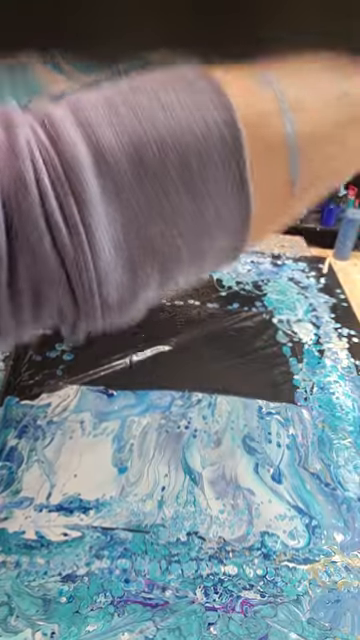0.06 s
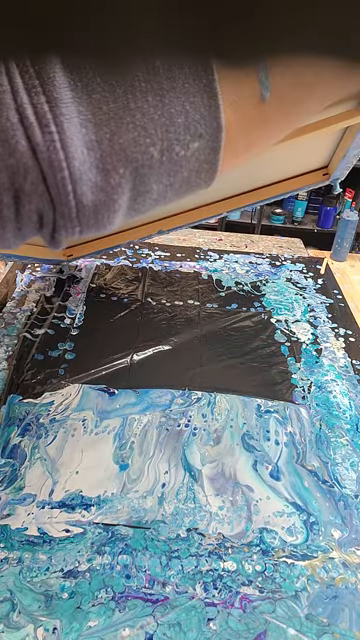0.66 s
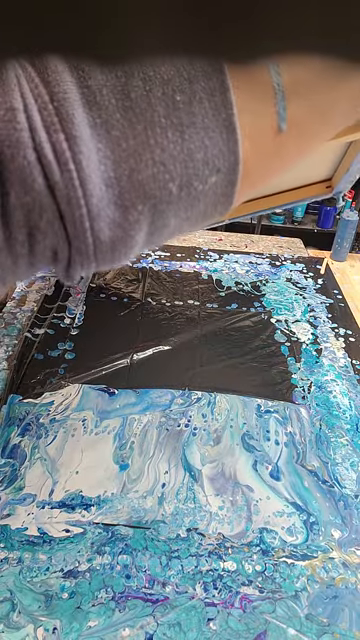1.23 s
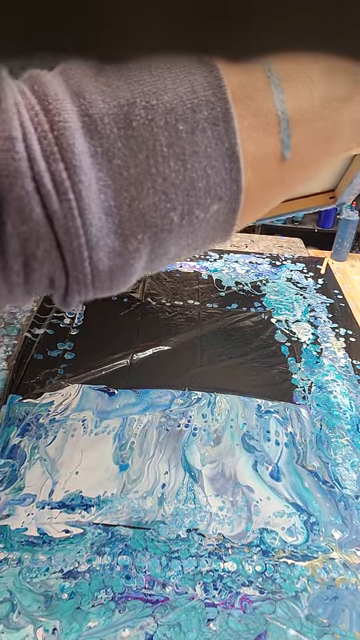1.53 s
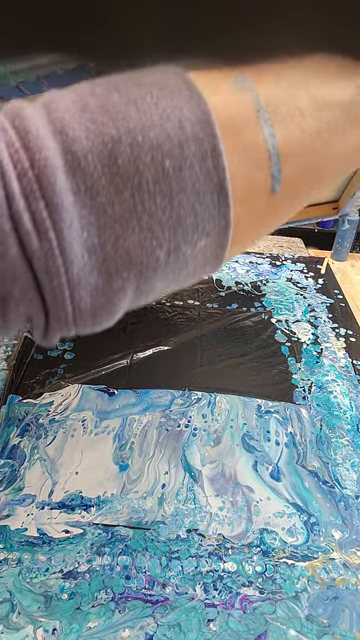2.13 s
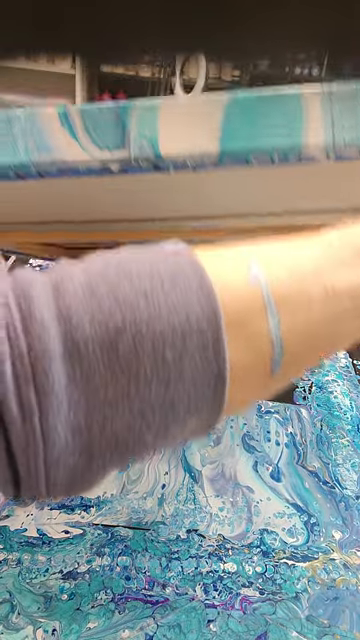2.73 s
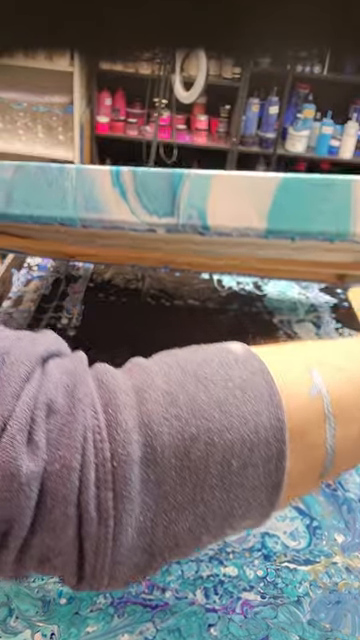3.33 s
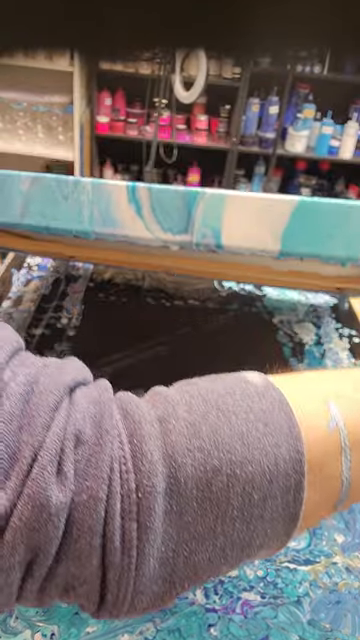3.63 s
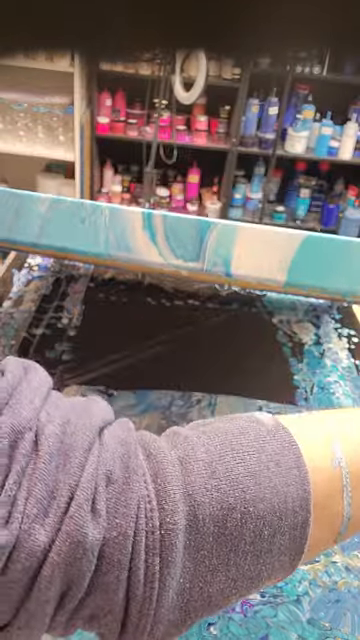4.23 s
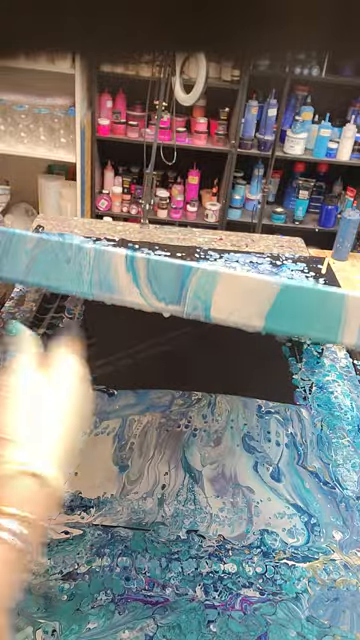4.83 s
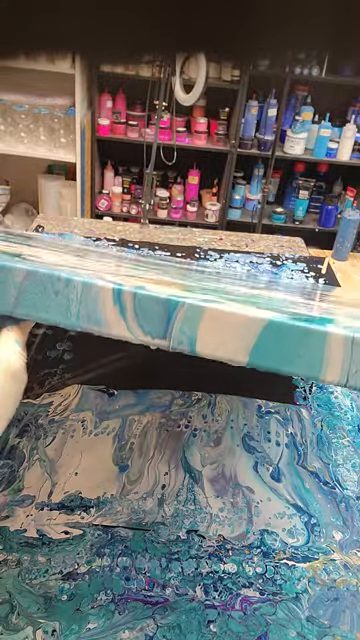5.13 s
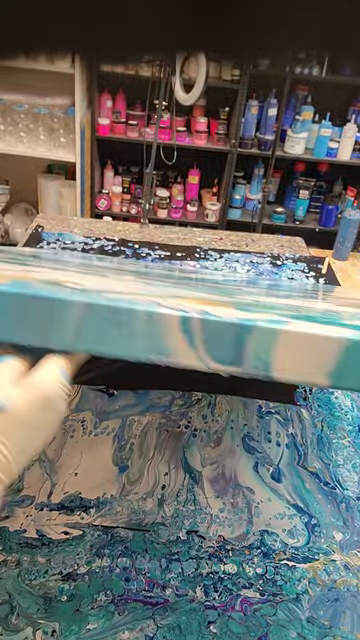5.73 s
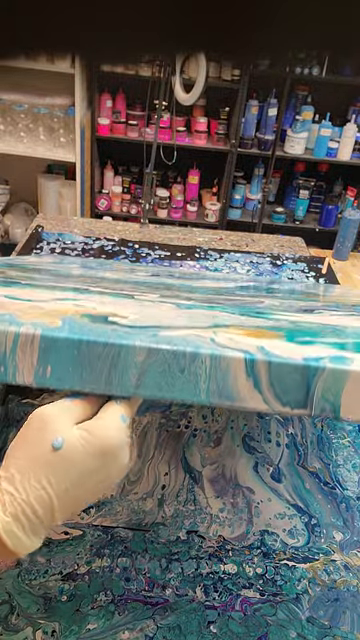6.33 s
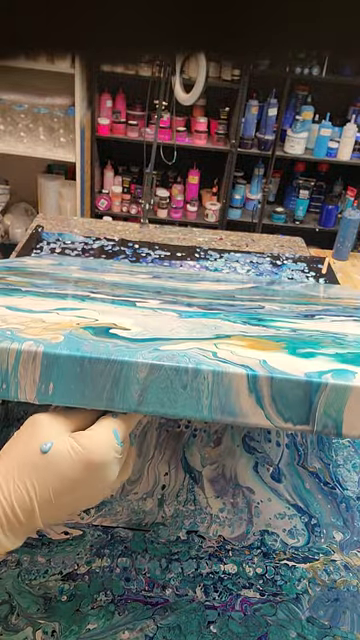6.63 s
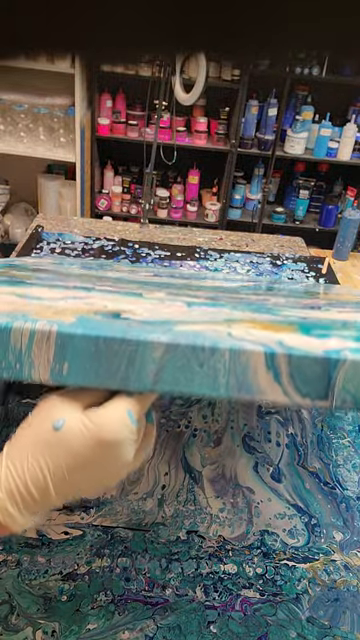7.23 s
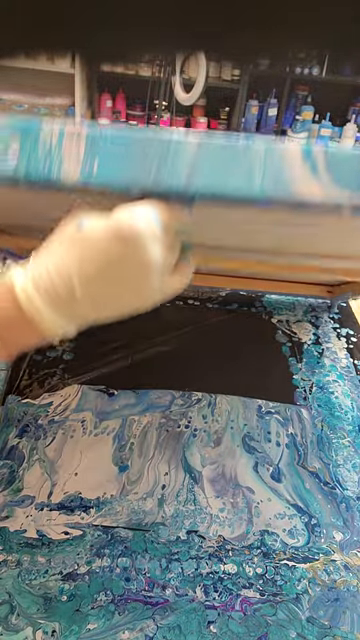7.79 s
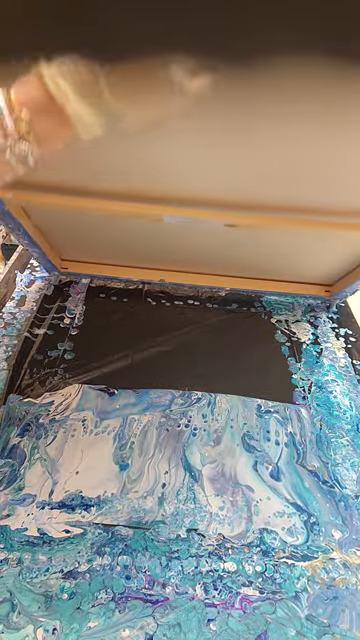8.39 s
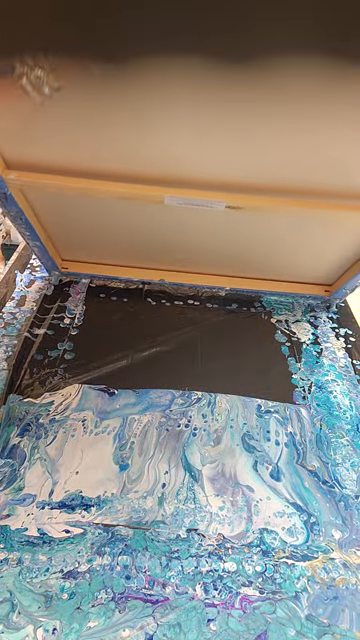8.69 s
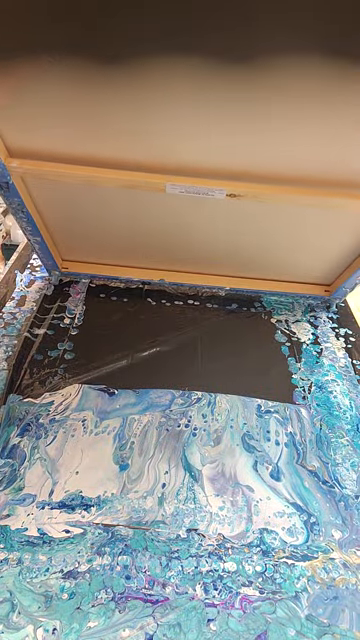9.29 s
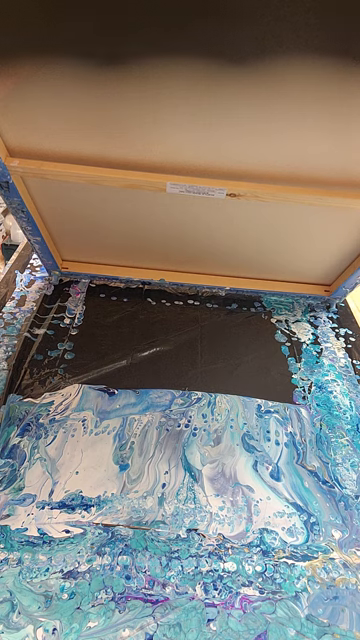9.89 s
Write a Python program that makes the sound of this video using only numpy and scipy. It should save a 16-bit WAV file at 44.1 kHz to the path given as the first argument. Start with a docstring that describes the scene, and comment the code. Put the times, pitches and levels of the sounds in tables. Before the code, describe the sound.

A very low ventilation rumble runs throughout in a small workroom, with the faint brush of a knitted sleeve close by. For the first four seconds, gloves and plastic sheeting give sparse, light clicks, the clearest near 1.4 seconds. At about 3.9 seconds a wooden-framed canvas meets its support with a soft thud, followed at once by a firmer, boomy knock. A bracelet clinks lightly at 4.6 seconds. At 5.3 seconds comes the loudest sound, a hollow wooden knock with a drum-like canvas thump, and a lighter second knock right after; both die away quickly in the room. From 5.5 to 7 seconds gloves rub and tick quietly on the canvas, ending in a short, brighter scuff around 7.2 seconds. A few faint clicks follow between 8.2 and 9.3 seconds. Everything is much quieter than the knocks.

```python
"""In a small workroom, gloved hands tilt a large wet canvas on a wooden stretcher.
The frame lands on its supports, two knocks at a time, and each impact excites the modes of wood and
canvas. Gloves and plastic sheeting click and slide by stick-slip friction; a bracelet's links collide
and ring. The room reverberates briefly, and a sleeve brushes close by over a low ventilation rumble."""
import sys
import numpy as np
from scipy import signal
from scipy.fft import rfft, irfft
from scipy.io import wavfile
from scipy.ndimage import uniform_filter1d

SR = 44100
rng = np.random.default_rng(int(sys.argv[2]) if len(sys.argv) > 2 else 0)


def inscribe(sig):
    """Save sig as 16-bit PCM at rate SR to the path in sys.argv[1].

    A 1-D sig is mono; a 2-D sig holds one channel per row.
    Samples are clipped to [-1, 1] before scaling.
    """
    pcm = np.round(np.clip(np.atleast_2d(sig).T, -1, 1) * 32767)
    wavfile.write(sys.argv[1], SR, pcm.astype(np.int16))


N = 438794
TIME = np.arange(N) / SR

# Landings on a support. Each row: start in seconds, level in dB, contact cutoff in Hz, then the
# relative gains in dB of the canvas boom, of the modes with a node there and of the wood crack.
LANDINGS = [(3.8932, -19, 360, 12, 0, -31), (4.0174, -8.5, 1900, 8, -19, -19.5),
            (5.2989, 0.5, 2400, 1.5, 0.5, -25.5), (5.4289, -7.5, 2000, 1, 1.5, -25)]
# Modes of canvas (lowest) and frame. Each row: frequency in Hz, gain in dB, decay T60 in seconds.
FRAME_MODES = [(43.4, -47.5, .35), (65.2, -42, 0.24), (92.2, -31, 0.3), (134.9, -17.5, 0.13),
               (154, -24.5, 0.054), (172.6, -8.5, 0.072), (198.3, -24.5, 0.22), (222.2, -29, 0.051),
               (274.6, -27.5, 0.14), (296.5, -27.5, 0.17), (343, -30, 0.17), (382.3, -23.5, 0.13),
               (429.4, -22.5, 0.12), (531, -29.5, 0.073), (569.5, -23, .085), (625.7, -21, 0.072),
               (705, -25.5, 0.058), (778.6, -41, 0.082), (890, -37.5, 0.11), (958, -46.5, .08),
               (1097, -42.5, 0.083), (1163, -42.5, 0.098), (1304, -42.5, 0.059), (1400, -51.5, 0.0693),
               (1460, -47.5, 0.05), (1523, -47.5, 0.048), (1640, -51, 0.084), (1822, -50, 0.069),
               (1926, -44, .07), (1950, -45.5, 0.14)]
# Direction of the modes. Each row: frequency in Hz, left minus right in dB.
FRAME_PAN = [(130, -1.9), (280, -1.5), (550, -7), (1200, -3), (2200, -3.5)]
# Spectrum of wood striking wood. Each row: frequency in Hz, gain in dB.
CRACK_SPECTRUM = [(100, 8.5), (400, 4.5), (640, 4.5), (800, -9), (1300, -5.5), (2200, -16.5), (2700, -23),
                  (4200, -27), (7000, -27.5), (16000, -48.5)]

def frame_knocks(canvas_below_hz=143, node_hz=225, node_octaves=0.38, travel_s=0.003064,
                 swell_s=0.0046, crack_t60=0.014, size=2 ** 15):
    """Modal vibration: an impact cracks, then rings frame and canvas; soft contact favours the boom."""
    out, t, f = np.zeros((2, N)), np.arange(size) / SR, bins(size)
    hz, db, t60 = np.transpose(FRAME_MODES)[:, :, None]
    stereo_gains = pan(1, along(FRAME_PAN, hz.T))
    # Dispersion: low bending waves travel slower, so the boom builds up after the crack.
    lag_s = 2 * travel_s * np.sqrt(1000 / hz)
    envelope = (1 - np.exp(-(t / swell_s) ** 2 * hz / 1000)) * fade(t, t60)
    on_node = np.exp(-(np.log2(hz / node_hz) / node_octaves) ** 2)
    for start, level_db, cutoff_hz, boom_db, node_db, crack_db in LANDINGS:
        # Grip and landing place differ a little each time.
        detune, shift = rng.standard_normal((2, len(hz), 1))
        phase = 2 * np.pi * hz * (1 + 0.0014 * detune) * (t - lag_s) + 0.6 * shift
        gain = undb(db + boom_db * (hz < canvas_below_hz) + node_db * on_node)
        gain *= undb(lowpass_db(hz, cutoff_hz, order=2))
        body = stereo_gains @ (gain * envelope * np.sin(phase))
        burst = diffuse(size, apart_hz=2193) * fade(t, crack_t60)
        crack = colour(burst, along(CRACK_SPECTRUM, f) + lowpass_db(f, cutoff_hz, order=1))
        crack = pan(with_energy(crack, 0.0089), -1.5)
        add(out, start, undb(level_db) * body)
        add(out, start + travel_s / 2, undb(level_db + crack_db) * crack)
    return out


# Clicks of gloves and sheeting, and one thin ring after the loudest knock. Each row: start in seconds,
# level in dB, resonance in Hz, width in octaves, decay T60 in seconds, second snap's strength (0 to 1).
CLICKS = [(.210, -59, 3380, 2.9, 0.017, 0), (0.4192, -57.5, 3040, 1, .04, 0.3),
          (0.831, -49.5, 6400, 0.41, .04, 0.4), (.861, -53.5, 5900, 0.48, .008, 0),
          (1.436, -40, 5600, 0.53, 0.027, 0), (1.6197, -50, 4200, 1.3, 0.028, 0.87),
          (1.7883, -52, 4600, 0.45, 0.013, 0.82), (2.4967, -58.5, 3750, 1.1, 0.035, 0.2),
          (2.549, -60, 4000, 3.2, 0.066, 0.2), (2.6546, -48, 3600, 0.64, 0.011, 0.43),
          (3.3882, -53.5, 3500, 0.26, 0.038, 0.13), (3.499, -46, 3870, 0.22, 0.038, 0.33),
          (3.902, -63.5, 4740, 1.7, .027, 0.44), (4.009, -58.5, 6540, 0.46, .0074, 0.25),
          (4.391, -63, 4400, 1.2, 0.0069, 0.16), (4.8646, -50, 2420, 3.9, 0.04, 0.05),
          (5.03, -47.5, 4650, 0.36, 0.0085, 0.04), (5.311, -51, 4100, 0.051, 0.15, 0),
          (5.37, -58.5, 6000, 1.2, .034, 0), (5.6088, -52, 4460, .7, 0.017, 0),
          (5.6368, -51, 3200, 0.23, 0.029, 0.5), (5.726, -53.5, 4200, 1.6, 0.0086, 0),
          (5.8927, -53, 5900, 1.1, 0.043, 0), (5.9282, -52.5, 3400, 0.29, 0.011, 0),
          (6.3038, -55.5, 4600, 0.17, 0.012, 0), (6.409, -53.5, 4440, 1.2, .009, 0.2),
          (6.6987, -55, 4100, 0.81, 0.028, 0), (7.285, -49, 5470, 0.32, 0.004, 0),
          (8.2282, -51.5, 4000, 0.43, 0.054, 0), (8.229, -46, 8380, 0.29, 0.011, 0),
          (8.312, -65, 1414, .05, 0.033, 0.04), (8.7828, -56, 4500, 0.6, 0.006, 0),
          (9.3065, -60, 3280, 0.13, 0.016, 0)]
# Tone shared by the clicks: woody body, bright presence, dull top.
# Each row: frequency in Hz, gain in dB.
CLICK_COLOUR = [(100, -0.5), (550, 3), (1100, -7), (2500, -4), (4400, -2), (5300, 3.5), (6300, -1.5),
                (7800, 0.5), (9200, -8.5), (11500, -17.5), (13000, -2), (16000, -21.5)]

def glove_and_sheet_clicks(second_snap_s=0.018, attack_s=0.00066, uneven_db=1.5, size=2 ** 13):
    """Stick-slip: a click is a snap and a dying rattle of slips through a resonance, often twice."""
    out, t, f = np.zeros((2, N)), np.arange(size) / SR, bins(size)
    for start, db, hz, octaves, t60, second in CLICKS:
        tone_db = hump(f, hz, octaves) + along(CLICK_COLOUR, f) + lowpass_db(f, 1.34 * hz, order=2)
        for delay_s, strength in ((0, 1), (second_snap_s, second)):
            noise = rng.standard_normal((4, size))
            each_side, common, roughness = noise[:2], noise[2], noise[3]
            slips = (common + each_side) * undb(-uneven_db * np.repeat(roughness, 32)[:size])
            slips *= (1 - np.exp(-t / attack_s)) * fade(t, t60)
            slips[:, 0] += 2  # the snap itself
            click = with_energy(colour(slips, tone_db), 0.0054)
            add(out, start + delay_s, strength * undb(db) * click)
    return out


# Collisions of the links. Each row: start in seconds, level in dB.
CLINKS = [(4.5635, -44.5), (4.584, -47.5), (5.671, -56), (6.616, -63)]
# Modes of the links. Each row: frequency in Hz, gain in dB, decay T60 in seconds.
LINK_MODES = [(5076, -6, 0.038), (6320, -4, .06), (6750, -4, .04), (7510, -6, 0.081), (10570, -18, .1),
              (13000, -11, 0.11), (15000, -17, .06), (15460, -12, 0.055)]
# Spectrum of link chattering on link. Each row: frequency in Hz, gain in dB.
CHATTER_SPECTRUM = [(500, -33), (2500, -13), (4500, -1.5), (6600, 1), (8500, 0.5), (11000, -7.5),
                    (13000, -1), (16000, -1)]
# The highest treble comes from the right. Each row: frequency in Hz, left minus right in dB.
CHATTER_PAN = [(8000, 0.5), (13000, -11)]

def bracelet(rattle_t60=0.04, ring_db=-5, size=2 ** 13):
    """Impact excitation: small metal links chatter together and drive their own brief resonances."""
    out, t, f = np.zeros((2, N)), np.arange(size) / SR, bins(size)
    hz, db, t60 = np.transpose(LINK_MODES)[:, :, None]
    modes = undb(db) * fade(t, t60) * np.sin(2 * np.pi * hz * t)
    link_response = rfft(modes.sum(axis=0))
    for start, level_db in CLINKS:
        rattle = rng.standard_normal((2, size)) * fade(t, rattle_t60)
        chatter = unit(colour(rattle, along(CHATTER_SPECTRUM, f)))
        ring = undb(ring_db) * unit(irfft(rfft(rattle) * link_response))
        clink = irfft(pan(rfft(chatter + ring), along(CHATTER_PAN, f)))
        add(out, start, undb(level_db) * with_energy(clink, 0.011))
    return out


# Spectrum of a glove rubbing taut canvas. Each row: frequency in Hz, gain in dB.
RUB_SPECTRUM = [(100, 9.5), (1000, -4), (1900, -1.5), (2400, -2.5), (3200, 2), (4300, 0), (5400, 6.5),
                (6200, -0.5), (7800, 0), (9800, -8.5), (13000, -10.5), (16000, -11.5)]

def friction(rubs, judder_db=3, crackle_db=2.5, trim_db=-6, size=2 ** 15):
    """Sliding friction: dense grains of noise swell and fade with the speed of each rub."""
    out, t, f = np.zeros((2, N)), (np.arange(size) - size // 2) / SR, bins(size)
    for peak_s, length_s, db, hz, octaves in rubs:
        # Most grains are tiny; a few catch and crackle.
        catches = np.repeat(rng.exponential(size=size // 16), 16).clip(0, 6)
        grains = diffuse(size, apart_hz=1508) * undb(crackle_db * catches)
        judder = undb(judder_db * wander(size, 200))
        rub = unit(judder * colour(grains, hump(f, hz, octaves) + along(RUB_SPECTRUM, f)))
        add(out, peak_s + t[0], undb(db + trim_db) * speed(t, length_s) * rub)
    return out


# Glove strokes. Each row: time of peak speed in seconds, length in seconds, relative level in dB.
STROKES = [(.92, 0.13, -67.5), (4.008, 0.032, -59), (4.142, 0.036, -66.5), (5.439, 0.15, -60),
           (5.648, 0.074, -57.5), (5.808, 0.12, -58), (5.929, 0.062, -57), (6.118, 0.047, -48),
           (6.349, .1, -57), (6.403, 0.066, -57.5), (6.539, .2, -73.5), (6.71, 0.025, -56),
           (6.753, 0.033, -63), (6.879, 0.057, -57.5), (6.949, 0.06, -59.5), (7.23, 0.015, -42),
           (7.255, 0.05, -51.5)]

def glove_strokes(usual_hz=4485, usual_db=-57, octaves_per_db=0.32, width_octaves=1):
    """Friction under load: a glove pressed harder on the canvas sounds louder and higher."""
    return friction((peak_s, length_s, db, usual_hz * 2 ** (octaves_per_db * (db - usual_db)),
                     width_octaves) for peak_s, length_s, db in STROKES)


# Dull rubs, and one narrow ringing tone after the first knock. Each row: time of the peak in seconds,
# length in seconds, relative level in dB, resonance in Hz, width in octaves.
DULL_RUBS = [(0.492, 0.23, -63.5, 283, .19), (1.946, .11, -65.5, 279, 0.26), (2.53, 0.079, -66, 1160, 0.21),
             (4.006, 0.12, -56, 608, 0.045), (5.899, 0.29, -72, 1740, 0.15), (6.294, 0.05, -62.5, 141, .11),
             (7.243, 0.063, -64, 400, .9)]

def dull_rubs():
    """Resonant filtering: grainy noise in one band is a dull rub, or a tone if the band is narrow."""
    return friction(DULL_RUBS)


# The room's share of the sound. Each row: frequency in Hz, gain in dB.
ROOM_SPECTRUM = [(60, -12), (150, -13), (500, -4), (1500, 2), (5000, 2.5), (16000, -6)]

def room(direct, bass_t60=0.74, mid_t60=0.34, treble_t60=0.26,
         early_db=3, early_t60=0.0967, onset_s=0.0011, size=2 ** 15):
    """Reverberation: table and shelves reflect at once; the walls ring on, longest in the bass."""
    t, f, noise = np.arange(size) / SR, bins(size), rfft(diffuse(size))
    centres = np.geomspace(60, 16000, 9)
    decay_times = [(60, bass_t60), (1000, mid_t60), (12000, treble_t60)]
    onset = 1 - np.exp(-(t / onset_s) ** 2)
    early = undb(early_db) * fade(t, early_t60)
    response = 0
    for hz, share in zip(centres, np.eye(len(centres))):
        band = irfft(noise * along(np.column_stack([centres, share]), f), size)
        tail = onset * (early + fade(t, along(decay_times, hz)))
        response += undb(along(ROOM_SPECTRUM, hz)) * band * tail / np.linalg.norm(tail)
    return signal.fftconvolve(direct.mean(axis=0)[None], response, axes=1)[:, :N]


# The arm lifts, turns and lowers the canvas.
# Each row: time of peak speed in seconds, length in seconds, level in dB.
ARM_MOVES = [(0, 0.85, -73), (1.998, 3.4, -79.5), (4.095, 0.18, -73), (4.792, 0.83, -78.5),
             (6.007, 1.5, -75), (8.25, 1.17, -76.5)]
# Spectrum of rubbing knitwear. Each row: frequency in Hz, gain in dB.
CLOTH_SPECTRUM = [(100, 3), (170, 10), (300, 7.5), (700, 2.5), (1300, -2), (2200, -2.5), (5000, -1),
                  (7500, -2), (10000, -18), (13000, -11.5), (16000, -12)]

def sleeve(rest_db=-83, flutter_db=0.9):
    """Friction noise: knitted cloth rubs softly, and each arm movement adds to its power."""
    flutter = undb(-flutter_db * wander(N, 2500))
    moving_power = sum((undb(db) * speed(TIME - peak_s, length_s)) ** 2
                       for peak_s, length_s, db in ARM_MOVES)
    rustle = unit(colour(diffuse(N), along(CLOTH_SPECTRUM, bins(N))))
    return rustle * np.sqrt(undb(rest_db) ** 2 + moving_power) * flutter


# Spectrum of the moving air. Each row: frequency in Hz, gain in dB.
AIR_SPECTRUM = [(12, -35), (20, -15.5), (91, -2), (107, -4.5), (120, -22), (146, -34.5), (241, -23.5),
                (367, -29), (446, -42.5), (558, -38.5), (802, -52.5), (976, -42), (1370, -46.5),
                (2820, -42.5), (16000, -66.5)]
# Drones of the duct. Each row: frequency in Hz, width in octaves, level in dB.
DUCT_DRONES = [(51.5, 0.069, -71.5), (86.55, 0.076, -67), (500.3, 0.053, -92), (1254, 0.05, -92)]

def ventilation(air_db=-67.5):
    """Flow noise: air rumbles steadily while the duct drones in narrow, wavering bands."""
    f = bins(N)
    air = undb(air_db) * unit(colour(diffuse(N), along(AIR_SPECTRUM, f)))
    drones = sum(undb(db) * unit(colour(diffuse(N), hump(f, hz, octaves, slope_db=10.5)))
                 for hz, octaves, db in DUCT_DRONES)
    return pan(air + drones, -1.5)


def speed(t, length_s, rise_share=0.48):
    """Skewed Gaussian: a hand speeds up, is fastest at t = 0 and slows down."""
    width_s = length_s * np.where(t < 0, rise_share, 1 - rise_share)
    return np.exp(-0.5 * (t / width_s) ** 2)


def diffuse(size, apart_hz=520):
    """Diffuse field: stereo noise, alike in the bass and unrelated well above apart_hz."""
    mid, side = rfft(rng.standard_normal((2, size)))
    coherence = 0.98 / (1 + (bins(size) / apart_hz) ** 2)
    spectrum = mid * np.sqrt(1 + coherence) + np.array([[1], [-1]]) * side * np.sqrt(1 - coherence)
    return irfft(spectrum, size) / np.sqrt(2)


def wander(size, window):
    """Moving average of noise over a window of samples, at rms 1."""
    return unit(uniform_filter1d(rng.standard_normal(size), size=window))


def colour(x, db):
    """Minimum-phase filter with the given gain per frequency bin."""
    size = x.shape[-1]
    cepstrum = irfft(np.log(undb(db)), size)
    cepstrum[1:size // 2] *= 2
    cepstrum[size // 2 + 1:] = 0
    return irfft(rfft(x) * np.exp(rfft(cepstrum)), size)


def hump(hz, centre_hz, octaves, slope_db=11):
    """Resonance curve in dB, falling faster from two octaves above its centre."""
    detuning = np.log2((hz + 1) / centre_hz) / octaves
    return -slope_db * np.log10(1 + detuning ** 2) + lowpass_db(hz, 4 * centre_hz, order=2)


def lowpass_db(hz, cutoff_hz, order):
    """Low-pass roll-off of 6 dB per octave for each order."""
    return -10 * np.log10(1 + (hz / cutoff_hz) ** (2 * order))


def fade(t, t60):
    """Exponential decay, by 60 dB in t60 seconds."""
    return np.exp(-np.log(1000) * t / t60)


def along(points, hz):
    """Interpolation of (Hz, value) points on a log-frequency axis."""
    f, value = np.transpose(points)
    return np.interp(np.log(hz + 1), np.log(f), value)


def bins(size):
    """Frequencies of a spectrum in Hz."""
    return np.arange(size // 2 + 1) * SR / size


def undb(db):
    """Decibels to gain."""
    return 10 ** (np.asarray(db) / 20)


def unit(x):
    """Normalisation to rms 1."""
    return x / np.sqrt(np.mean(x ** 2))


def with_energy(x, seconds):
    """Normalisation to the energy of an rms-1 signal lasting this long."""
    return x / np.sqrt(np.sum(x ** 2) / (SR * seconds))


def pan(x, db):
    """Level difference: left exceeds right by db, a number or a curve."""
    return x * undb(np.array([[0.5], [-0.5]]) * db)


def add(out, start_s, sound):
    """Superposition of a sound from start_s on."""
    i = max(int(start_s * SR), 0)
    out[:, i:i + sound.shape[-1]] += sound[..., :N - i]


# Where the hands are. Each row: time in seconds, left minus right in dB.
HANDS_PAN = [(0, -4), (1.4, -2.5), (2.7, -5), (4.5, 2), (4.9, -3.5), (6.4, -6.5), (7.25, -4.5), (8.2, 5.5),
             (9.3, 5)]

def scene():
    """Superposition: handling sounds and their reverberation, over sleeve and ventilation."""
    impacts = frame_knocks() + bracelet()
    handling = glove_and_sheet_clicks() + glove_strokes() + dull_rubs()
    hands_db = np.interp(TIME, *np.transpose(HANDS_PAN))
    direct = impacts + pan(handling, hands_db)
    return direct + pan(room(direct), -1.6) + sleeve() + ventilation()


def record(dry):
    """Band limiting: the phone's steep low-pass filter cuts the highest treble."""
    top_hz = 15900
    return signal.sosfilt(signal.ellip(10, 0.2, 70, top_hz, fs=SR, output="sos"), dry)


dry = scene()
out = record(dry)
inscribe(out)
```